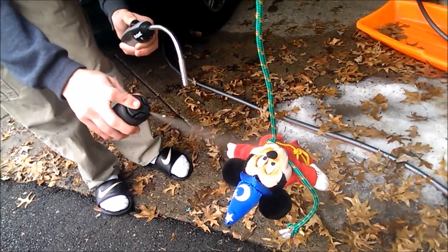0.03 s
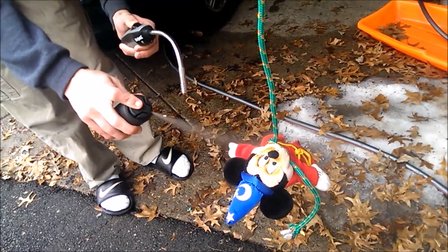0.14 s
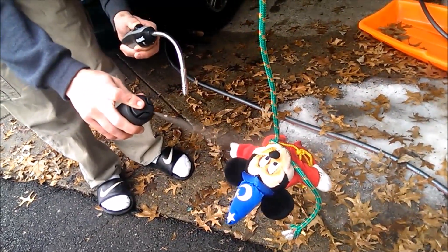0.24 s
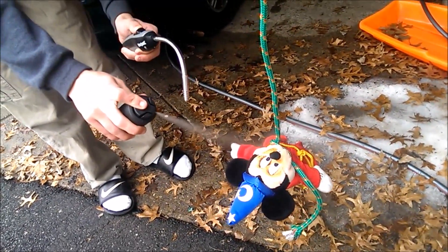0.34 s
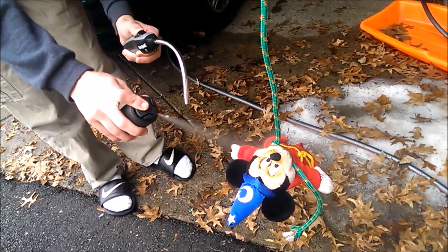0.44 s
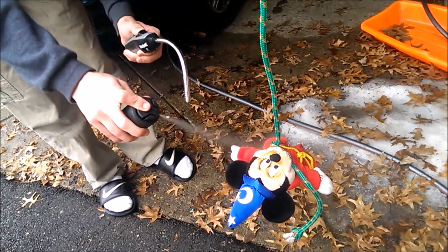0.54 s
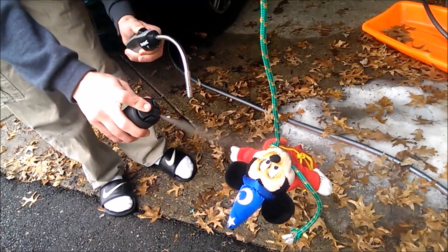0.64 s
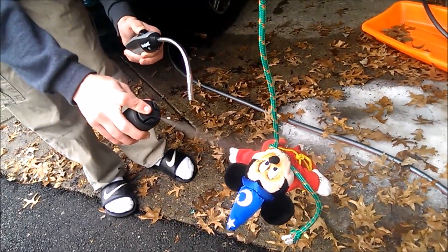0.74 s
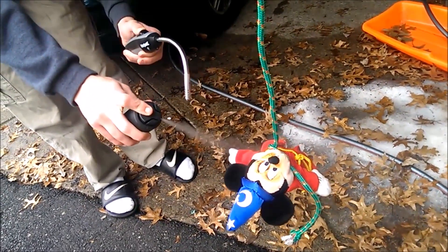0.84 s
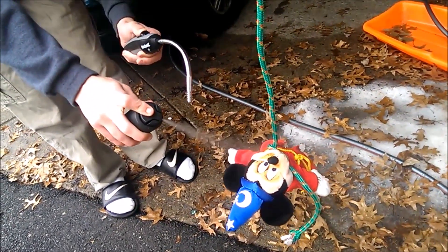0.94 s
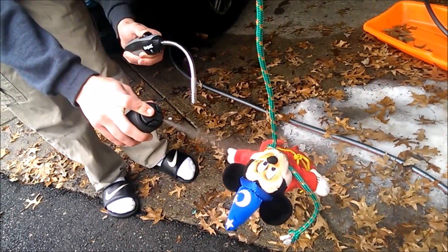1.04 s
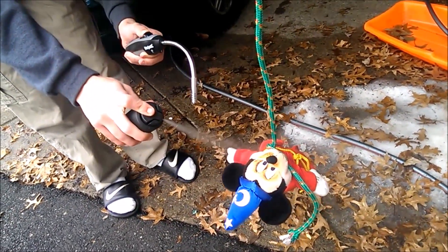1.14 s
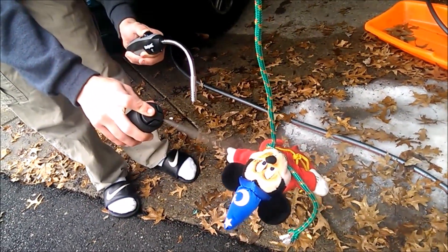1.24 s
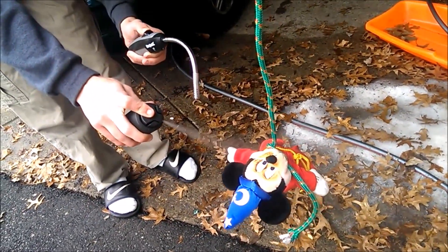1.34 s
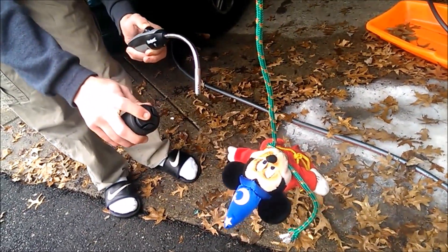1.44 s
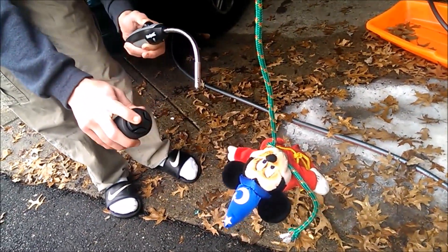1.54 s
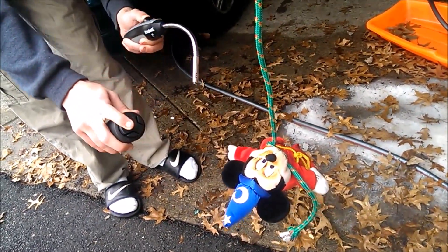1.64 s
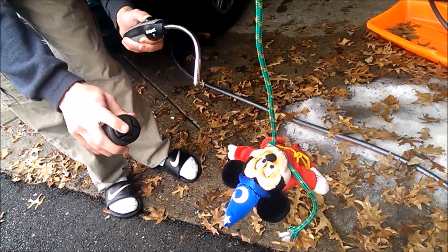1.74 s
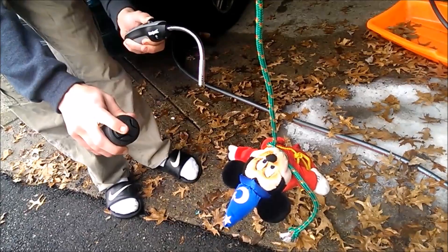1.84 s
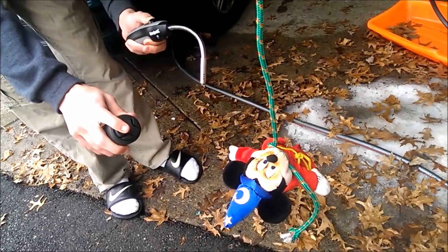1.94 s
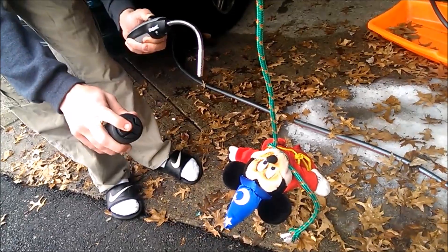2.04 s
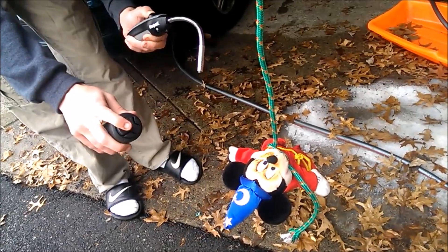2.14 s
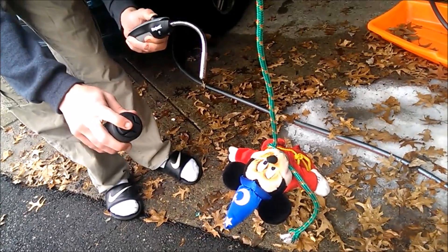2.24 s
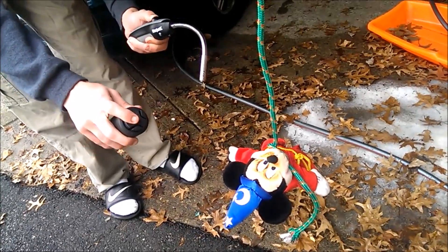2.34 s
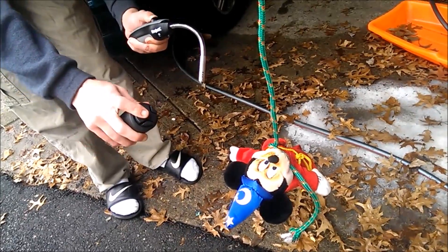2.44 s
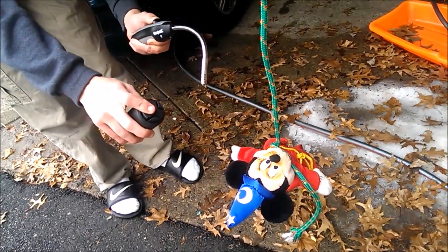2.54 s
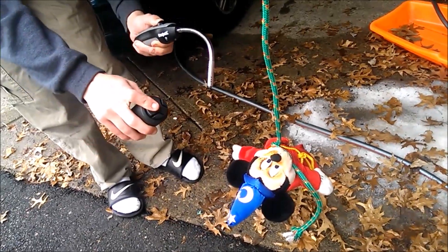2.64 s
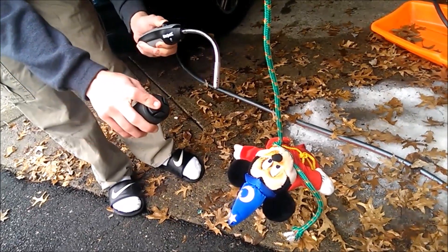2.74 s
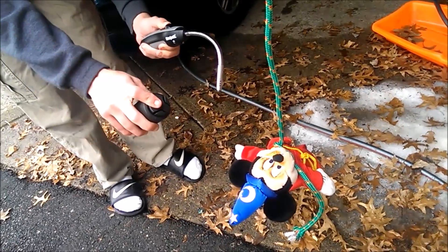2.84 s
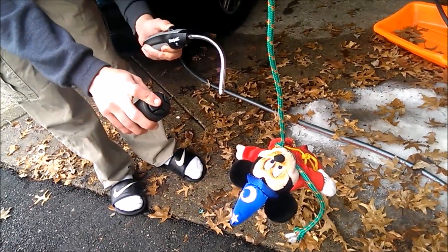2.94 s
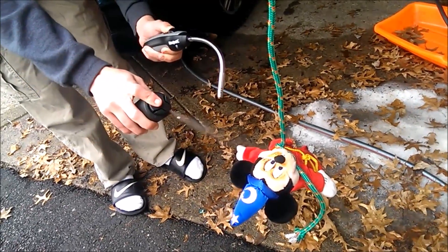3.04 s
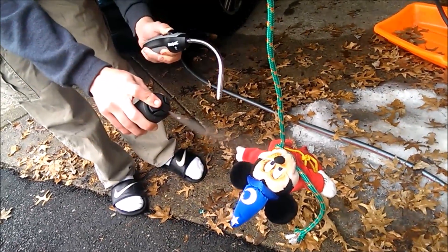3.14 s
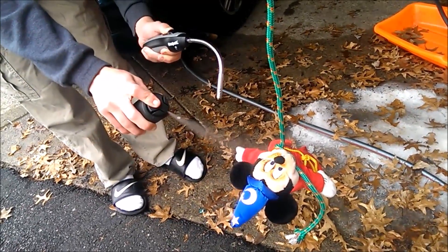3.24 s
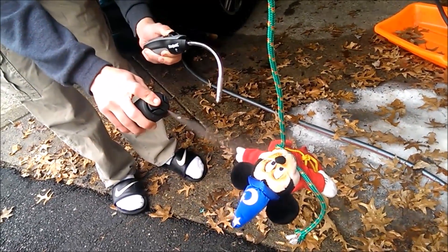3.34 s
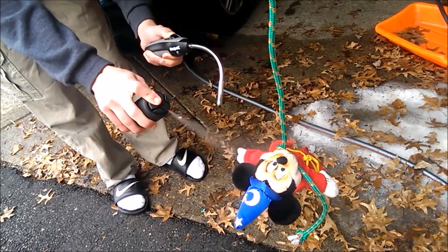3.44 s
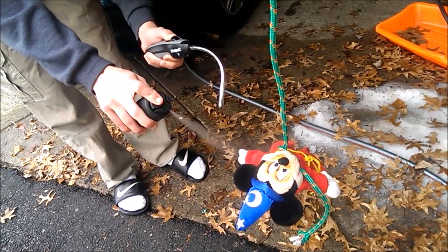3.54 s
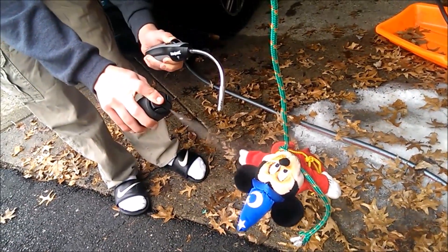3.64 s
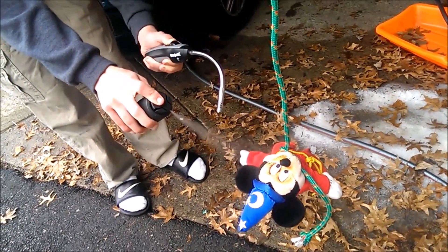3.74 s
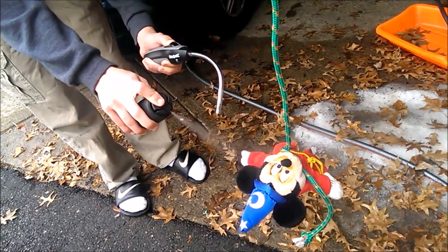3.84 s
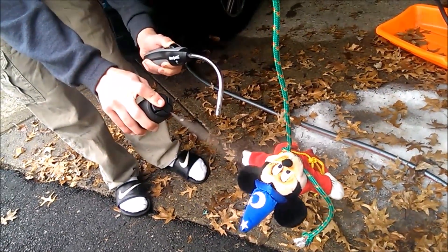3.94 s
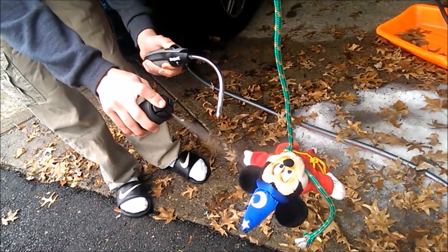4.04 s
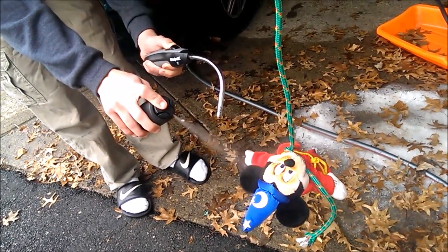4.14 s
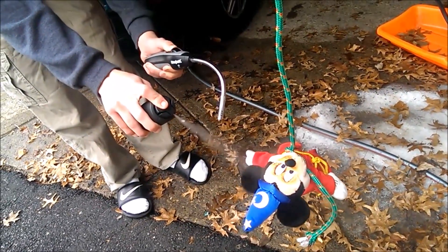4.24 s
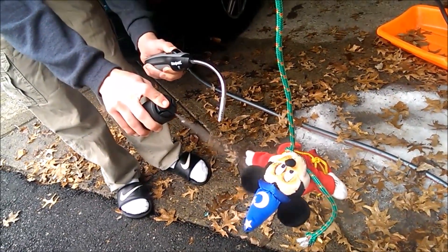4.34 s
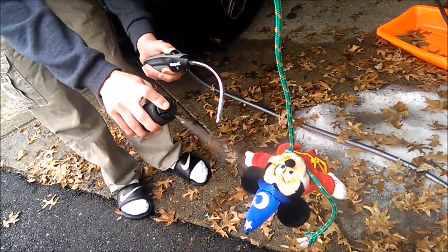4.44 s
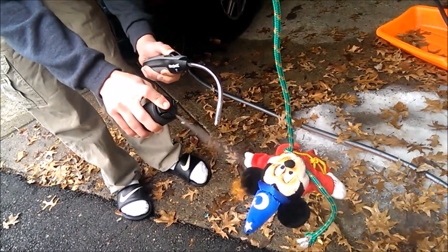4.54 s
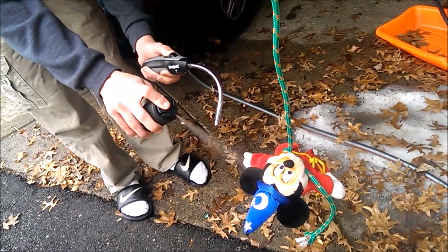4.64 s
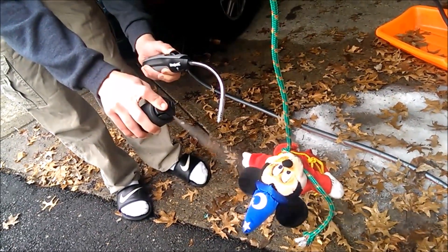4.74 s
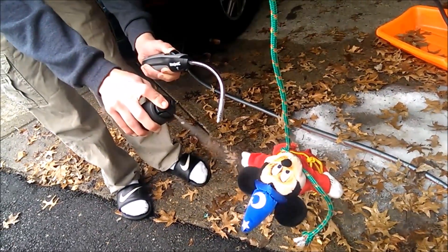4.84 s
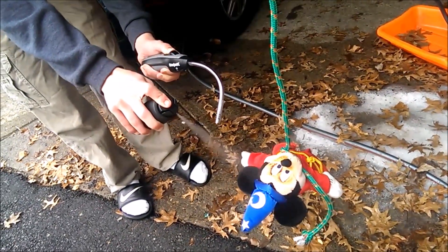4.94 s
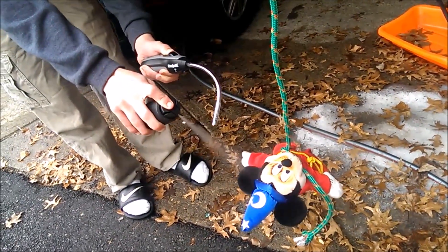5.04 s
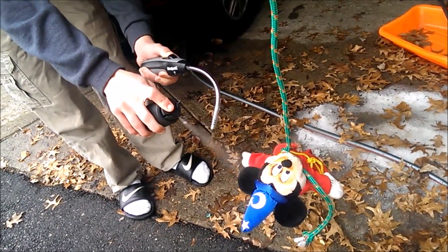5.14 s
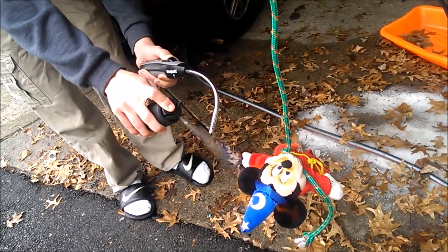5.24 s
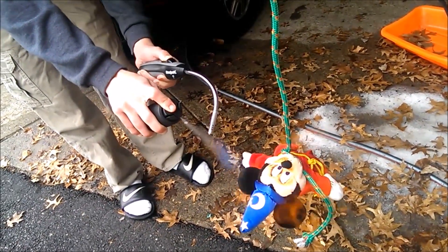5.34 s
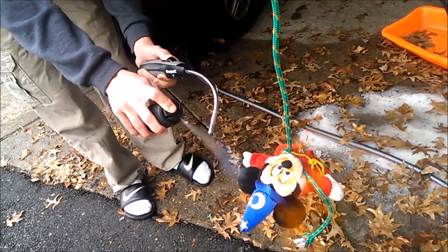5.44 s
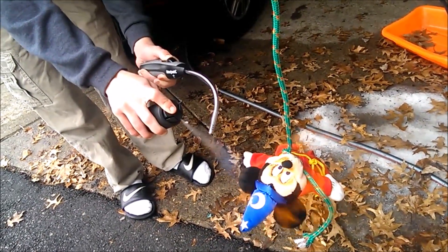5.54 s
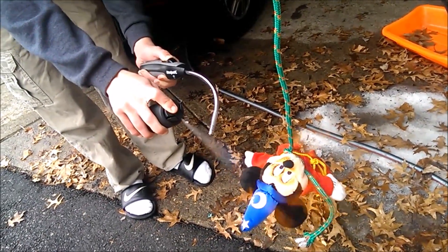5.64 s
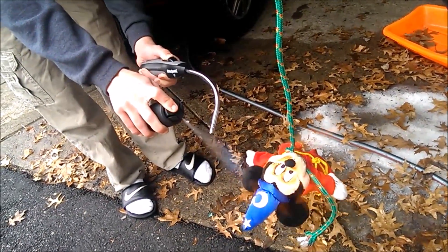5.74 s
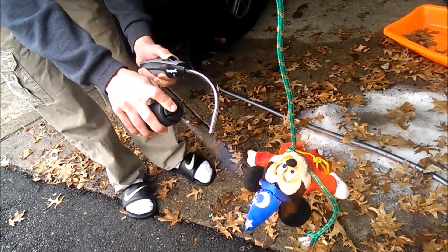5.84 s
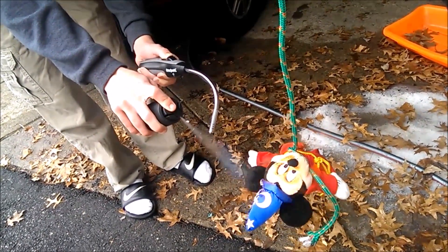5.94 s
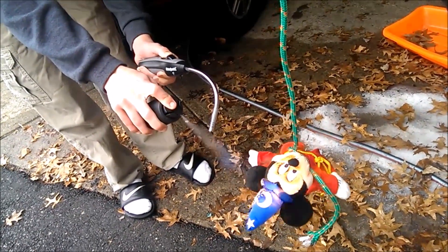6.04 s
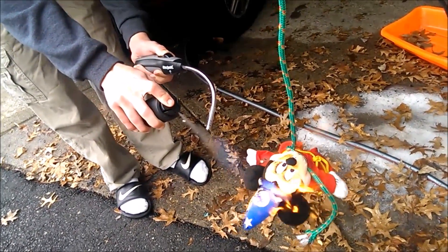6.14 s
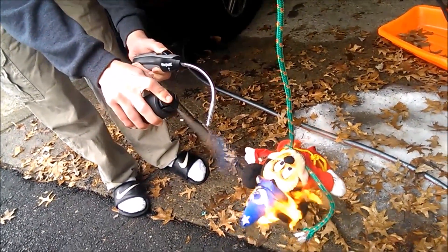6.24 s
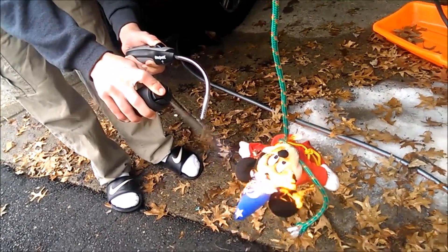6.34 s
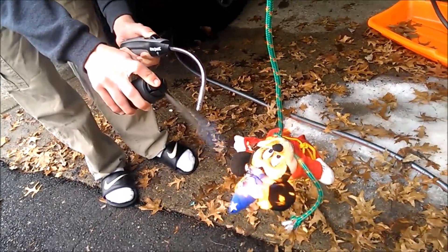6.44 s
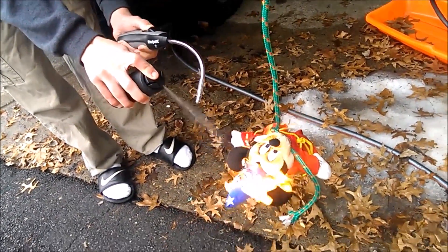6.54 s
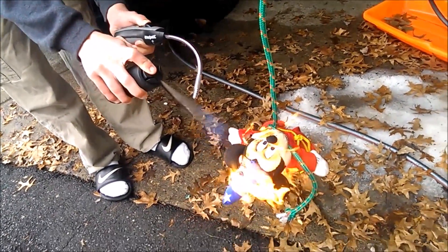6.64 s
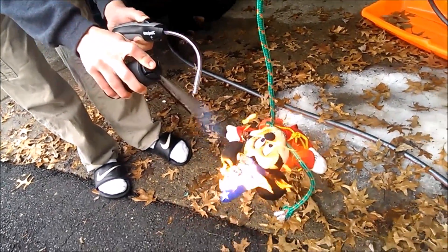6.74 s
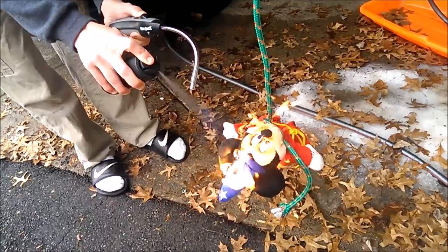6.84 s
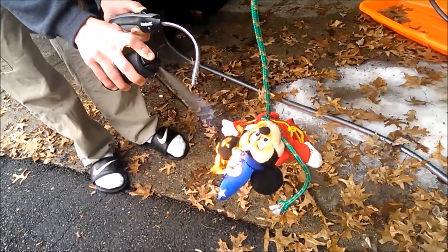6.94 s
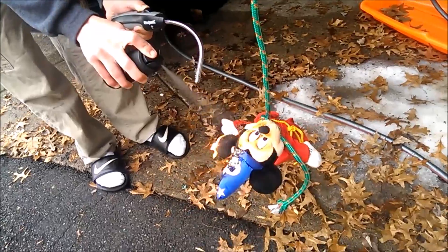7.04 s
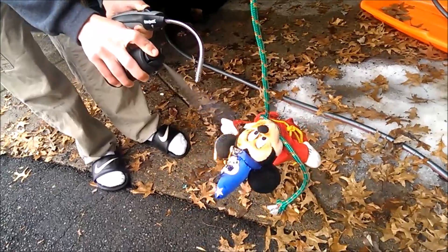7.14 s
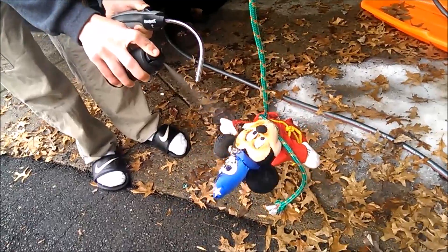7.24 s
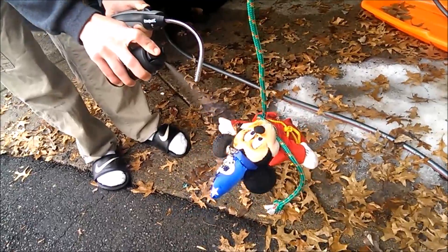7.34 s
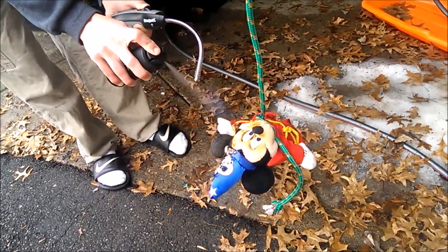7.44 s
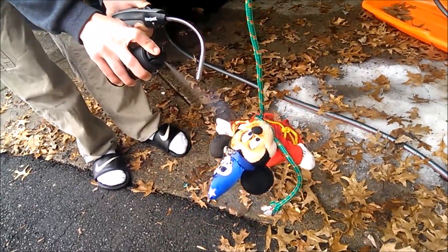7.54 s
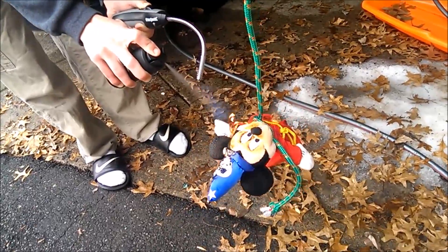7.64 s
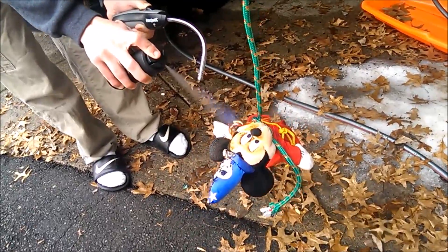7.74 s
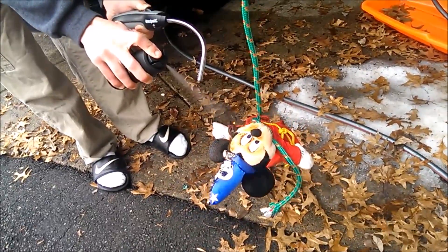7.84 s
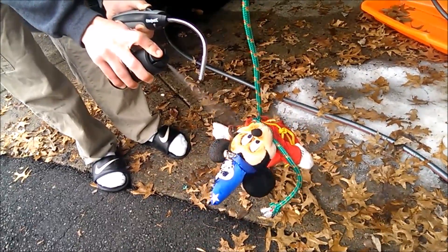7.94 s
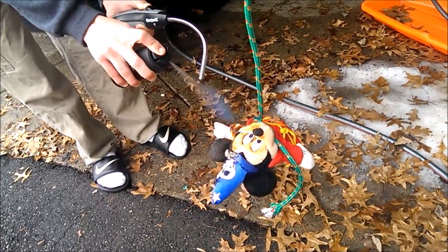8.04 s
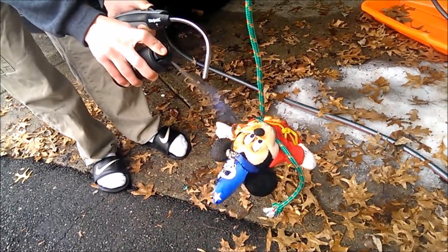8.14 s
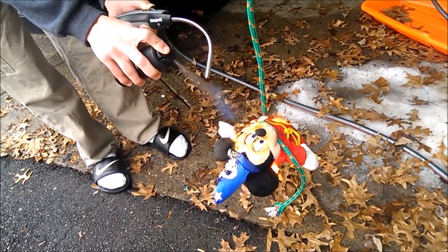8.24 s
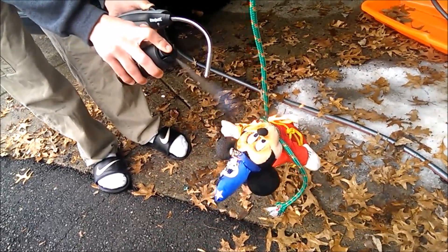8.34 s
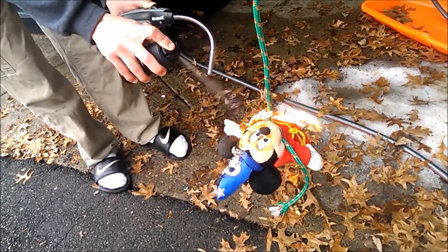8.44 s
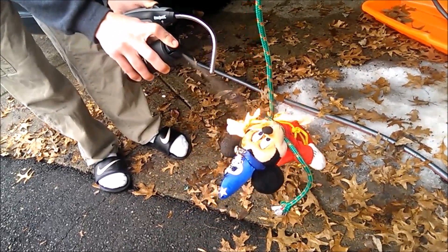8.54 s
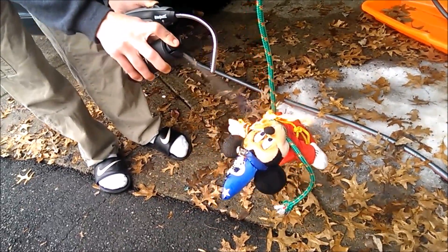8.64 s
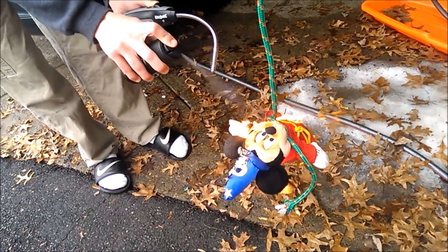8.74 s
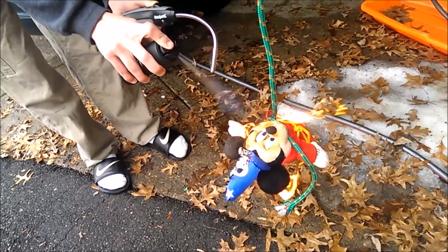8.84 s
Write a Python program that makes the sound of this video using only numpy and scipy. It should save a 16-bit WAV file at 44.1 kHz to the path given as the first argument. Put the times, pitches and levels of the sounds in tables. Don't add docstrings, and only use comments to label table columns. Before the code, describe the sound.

Close spray-can hiss and sharp lighter clicks, a brief quiet gap, renewed spray, one short fiery pop, then a rough flame roar sputtering and relighting.

```python
import sys
import numpy as np
from scipy import signal
from scipy.fft import rfft, irfft
from scipy.io import wavfile
from scipy.ndimage import uniform_filter1d

SR = 44100
rng = np.random.default_rng(int(sys.argv[2]) if len(sys.argv) > 2 else 0)


def wav_record(signal):
    frames = np.transpose(np.atleast_2d(signal))
    bounded = np.clip(frames, -1, 1)
    quanta = np.round(bounded * 32767).astype(np.int16)
    wavfile.write(sys.argv[1], SR, quanta)


def level_to_linear(level):
    exponent = np.asarray(level, float) / 20
    return 10 ** exponent


N = 392049

FULL_DB = -25
# [t/s, roar level/dB]
VIGOUR = [(5.36, -67), (5.37, -26.5), (5.54, -24.5), (5.9, -24), (6.37, -26), (6.7, -24.5), (6.97, -24),
          (7.17, -25.5), (7.21, -29.5), (7.235, -51), (7.3, -33.5), (7.62, -26), (8.0, -26.5), (8.5, -26),
          (8.74, -28.5), (8.89, -24.5)]


def rms_one(x):
    return x / np.sqrt(np.mean(x ** 2) + 1e-20)


def in_time(rows):
    s, level_db = np.transpose(rows)
    return np.interp(np.arange(N) / SR, s, level_db, left=-150.)


def at_hz(points, hz):
    table = np.array(points)
    return np.interp(np.log(hz), np.log(table[:, 0]), table[:, 1])


def drift(rate_hz):
    r = np.exp(-80 * np.pi * rate_hz / SR)
    settle = 2000
    white = rng.standard_normal(N // 40 + 2 + settle)
    slow = signal.lfilter([1], [1, -2 * r, r * r], white)[settle:]
    return np.interp(np.arange(N) / 40, np.arange(len(slow)), rms_one(slow))


def ring(x, hz, t60_s):
    r, w = level_to_linear(-60 / (t60_s * SR)), 2 * np.pi * hz / SR
    return signal.lfilter([0, np.sin(w)], [1, -2 * r * np.cos(w), r * r], x + 1e-18)


def fade(x, t60_s):
    return signal.lfilter([1], [1, -level_to_linear(-60 / (t60_s * SR))], x + 1e-18)


def butter(x, order, hz, kind="low"):
    return signal.sosfilt(signal.butter(order, hz, kind, fs=SR, output="sos"), x)


def coloured(x, points, lag_s=0):
    size = 8192
    hz = np.maximum(np.fft.rfftfreq(size, 1 / SR), 1)
    cepstrum = irfft(np.log(level_to_linear(at_hz(points, hz))))
    cepstrum[1:size // 2] *= 2
    cepstrum[size // 2 + 1:] = 0
    pulse = irfft(np.exp(rfft(cepstrum) - 2j * np.pi * hz * lag_s))
    return signal.oaconvolve(np.atleast_2d(x), pulse[None], axes=1)[:, :N]


def blend(shared, common, own):
    shared = np.clip(shared, 0, 1)
    return np.sqrt(shared) * common + np.sqrt(1 - shared) * np.array(own)


def pair(shared):
    common, *own = rng.standard_normal((3, N))
    return blend(shared, common, own)


def spray():
    # [t/s, hiss level/dB]
    valve = [(0, -25), (1.546, -25), (1.58, -33.5), (1.622, -57), (1.66, -79.5), (2.796, -85), (2.824, -50),
             (2.884, -41.5), (3.17, -34.5), (3.198, -27.5), (3.3, -25.5), (7.6, -25), (7.95, -25.5),
             (8.02, -28.5), (8.25, -30.5), (8.89, -32)]
    # [f/Hz, level/dB per Hz]
    jet_spectrum = [(25, 5), (120, -8), (235, -50.5), (310, -14), (700, -14), (1000, -10), (2000, -9),
                    (5000, -7), (9000, -1), (16000, 1.5)]
    nozzle_hz, nozzle_width_hz, nozzle_db = 1220, 98, -24

    hiss_db = in_time(valve)
    splash_db = np.minimum(-2.5 + 0.6 * (FULL_DB - hiss_db), 2.5)
    vigour_db = in_time(VIGOUR)
    falter_db = np.where(vigour_db > -50, FULL_DB - vigour_db, 0)
    splash_db += np.clip(2.1 * falter_db, 0, 7.5)

    jet = rms_one(coloured(pair(0.23), jet_spectrum))
    jet = jet + level_to_linear(nozzle_db) * rms_one(ring(pair(0.7), nozzle_hz, 2.2 / nozzle_width_hz))
    splash = butter(jet, 2, 3500)
    flutter = level_to_linear(0.83 * drift(11.4) + 0.53 * drift(57))
    return level_to_linear(hiss_db - 7.5) * flutter * (jet + (level_to_linear(splash_db) - 1) * splash)


def catch():
    start_s, attack_s, fuel_s, peak_db = 4.698, 0.006, 0.085, -27.5
    fade_db_per_s, die_db_per_s = 130, 270
    age = np.arange(N) / SR - start_s
    rise_db = -17 * np.clip(1 - age / attack_s, 0, 1)
    fall_db = fade_db_per_s * np.minimum(age, fuel_s) + die_db_per_s * np.maximum(age - fuel_s, 0)
    return np.where(age > 0, np.maximum(peak_db + rise_db - fall_db, -150), -150.)


def puffs():
    # [t/s, flare level/dB, pressure push level/dB, depth of the blow-out before it/dB]
    relightings = [(4.7, -25, -12.5, 2), (4.773, -38, -35, 1), (5.372, -18.5, -11.5, 0),
                   (5.567, -41, -15.5, 4.5), (6.691, -20.5, -31, -2), (6.733, -38, -17, 1.5),
                   (6.991, -24, -17, 7.5), (7.059, -47, -13.5, 6.5), (7.091, -33, -16, 4.5),
                   (7.194, -33, -15, 10), (7.268, -28, -25, 0), (7.304, -33, -24, 14), (7.368, -31, -17, 4),
                   (7.414, -27, -31, 6.5), (7.456, -45, -16, 15.5), (7.76, -24, -16, 7.5),
                   (7.8, -28, -21, 4.5), (7.912, -34, -14.5, 9), (7.935, -25, -19, 1.5),
                   (7.998, -40, -18, 7), (8.042, -31, -17, 7.5), (8.076, -44, -22, 4), (8.156, -32, -12, 9),
                   (8.268, -26, -14.5, 4.5), (8.32, -42, -20, 4.5), (8.419, -27, -30, 4),
                   (8.77, -25, -19, 5.5), (8.842, -30, -17, 4.5)]
    t = np.arange(N) / SR
    push, flare, dip_db = np.zeros((3, N))
    for s, flare_db, push_db, depth_db in relightings:
        i = round(s * SR)
        flare[i + 130] = level_to_linear(flare_db)
        blowout_s = max(0.013 + 0.0018 * depth_db, 0.002)
        dip_db[i - round(blowout_s * SR):i] = -depth_db
        near = slice(i - 900, i + 2000)
        u = (t[near] - s) / 0.0023
        swell = np.exp(np.minimum(u, 0))
        collapse = (1 - 0.75 * u) * np.exp(-0.55 * np.abs(u))
        push[near] += level_to_linear(push_db + 3.5) * np.where(u < 0, swell, collapse)
    return push, flare, uniform_filter1d(dip_db, size=150)


def burning():
    # [f/Hz, level/dB per Hz]
    flame_spectrum = [(25, 4), (60, 1), (125, 6.5), (190, -3), (320, 1), (500, -8), (750, -9),
                      (1000, -12.5), (1700, -12.5), (2300, -15), (4000, -22), (6000, -28), (9000, -44)]
    # [f/Hz, left-right likeness 0-1]
    likeness = [(30, 0.98), (300, .93), (700, 0.81), (2000, 0.94), (3000, 0.68), (4500, 0.17), (8000, .35)]
    roar, rumble = 0, 0
    edges_hz = 20 * 2 ** np.arange(0, 9.1, 0.5)
    white = rng.standard_normal((2, 3, N))
    for k, (low, high) in enumerate(zip(edges_hz, edges_hz[1:])):
        common, *own = butter(white[k % 2], 2, [low, high], "band")
        hz = np.sqrt(low * high)
        band_db = at_hz(flame_spectrum, hz) + 0.9 * drift(6.2) + 1.28 * drift(24)
        band = level_to_linear(band_db) * blend(at_hz(likeness, hz), common, own)
        if hz < 230:
            rumble = rumble + band
        else:
            roar = roar + band
    return rms_one(roar), rms_one(rumble)


def flame():
    vigour_db, catch_db = in_time(VIGOUR), catch()
    roar_db = np.maximum(vigour_db, catch_db)
    swing_db = vigour_db - FULL_DB
    rumble_db = -25.5 + np.where(swing_db > -30, 0.41 * swing_db, swing_db)
    rumble_db = np.maximum(rumble_db, catch_db - 0.5)

    push, flare, dip_db = puffs()
    roar, rumble = burning()
    eddies_db = 0.5 * drift(9) + 0.9 * drift(60)
    dull = butter(roar, 3, 2600)
    growth = np.clip((np.arange(N) / SR - 5.36) / 0.047, 0, 1)
    roar = dull + growth * (roar - dull)
    fire = roar * level_to_linear(roar_db - 1.27 + eddies_db + dip_db)
    fire = fire + dull * fade(flare, 0.049)
    fire = fire + rumble * level_to_linear(rumble_db + 0.42 * dip_db + 0.42 * eddies_db) + push
    fire[0] = np.r_[0, 0, fire[0, :-2]]

    echo_s, echo_db = 0.002704, -12
    bounce = np.pad(fire, ((0, 0), (round(echo_s * SR), 0)))[:, :N]
    return fire + level_to_linear(echo_db) * signal.lfilter([0.4], [1, -0.6], bounce)


def lighter():
    # [t/s, peak level/dB, brightness/dB, tail level/dB re peak]
    snaps = [
        (0.46, -9.5, 2.5, -13.5),
        (1.122, -9, 0, -14.5),
        (1.905, -8.5, 1, -13.5),
    ]
    # [t/s, peak level/dB, brightness/dB, tail level/dB re peak]
    ticks = [(0.331, -24.5, -12.5, -10), (0.89, -34, -12, -12), (1.003, -28, -6, -8),
             (1.538, -28.5, -14, -13.5), (1.691, -56, 5, -14), (1.751, -46, -10, -22),
             (1.773, -30.5, -6, -18), (1.866, -59, 0.5, -19.5), (2.027, -50, 2, -39), (2.057, -56, -6, -25),
             (2.107, -62, -1, -16), (2.145, -61, -3, -12), (2.157, -59, 0, -8), (2.672, -60, -15, -25)]
    # [t after snap/s, level/dB]
    rebounds = [
        (-.0012, 4),
        (.0003, 4),
        (.0026, -6.5),
        (.0036, -10),
        (.0049, -3.5),
        (.007, -13.5),
    ]
    # [f/Hz, level/dB, t60/s]
    shell_modes = [(1330, -5, 0.031), (1620, -5, 0.039), (1970, -2.5, 0.03), (3150, 3, 0.027),
                   (3690, 3, 0.018), (4340, -3, 0.03)]
    grip_hz, grip_db, grip_t60_s = 1260, -19.5, 0.025

    knocks, cracks, tails = np.zeros((3, N))
    gentle = np.ones(N)
    for s, *_ in snaps:
        i = round(s * SR)
        gentle[i - 200:i + 600] = 0
    for s, peak_db, bright_db, tail_db in snaps + ticks:
        chances = rng.standard_normal((len(rebounds), 2))
        for (after_s, level_db), (late, luck) in zip(rebounds, chances):
            i = round((s + after_s * (1 + 0.06 * late)) * SR)
            knocks[i] += level_to_linear(peak_db + level_db + 0.5 * luck) * np.sign(late)
            cracks[i] += level_to_linear(peak_db + level_db + bright_db)
        tails[round((s + 0.003) * SR)] += level_to_linear(peak_db + tail_db)

    soft = 1.96 * signal.lfilter([0.25], [1, -0.75], knocks)
    knocks += gentle * (soft - knocks)
    shell = sum(level_to_linear(level_db - 21) * ring(knocks, hz, t60_s) for hz, level_db, t60_s in shell_modes)
    shell += level_to_linear(grip_db) * ring(gentle * knocks, grip_hz, grip_t60_s)
    crack = level_to_linear(-10) * fade(cracks, 0.01) * pair(0.64)
    walls = pair(0.15)
    low = butter(walls, 2, 5500)
    tail = level_to_linear(-0.5) * (fade(tails, 0.25) * low + level_to_linear(-5.5) * fade(tails, 0.2) * (walls - low))
    side_gain = level_to_linear(np.array([[-2.5], [1.5]]))
    return butter(shell * side_gain + crack + tail, 5, 1080, "high")


def bird():
    # [t after start/s, length/s, from f/Hz, to f/Hz, level/dB]
    phrase = [
        (-.14, .055, 1850, 1960, -2.5),
        (-.1, .062, 1950, 2470, 8),
        (0, .05, 3120, 2800, 6.5),
        (0.05, 0.036, 2550, 2150, 5.5),
        (.14, .03, 4000, 3150, -1),
        (.22, .1, 3420, 3380, -4),
    ]
    # [t/s, level/dB]
    song = [
        (1.63, -53.5),
        (2.075, -57),
        (2.52, -58),
    ]
    out = np.zeros(N)
    for start_s, phrase_db in song:
        for after_s, length_s, from_hz, to_hz, level_db in phrase:
            n, i = round(length_s * SR), round((start_s + after_s) * SR)
            phase = 2 * np.pi * np.cumsum(np.linspace(from_hz, to_hz, n)) / SR
            out[i:i + n] += level_to_linear(phrase_db + level_db) * np.sqrt(np.hanning(n)) * np.sin(phase)
    echo_t60_s = 0.3
    echo = rng.standard_normal((2, 9000)) * level_to_linear(-60 * np.arange(9000) / SR / echo_t60_s)
    blur = signal.oaconvolve(out[None], echo, axes=1)[:, :N]
    return out * level_to_linear(drift(25)) + level_to_linear(-40) * blur


def yard():
    # [f/Hz, level/dB per Hz]
    yard_spectrum = [(25, 9.5), (120, -3), (235, -24), (330, -18), (700, -17), (1200, -20), (2400, -15.5),
                     (3400, -12.5), (4100, -30.5), (5000, -34.5), (7000, -31.5), (12000, -44), (16000, -46)]
    return level_to_linear(-59 + 1.29 * drift(3.6)) * rms_one(coloured(pair(0.55), yard_spectrum))


def scene():
    return spray() + flame() + lighter() + bird() + yard()


def top_cut(x):
    return signal.sosfilt(signal.butter(12, 16450, fs=SR, output="sos"), x)


def record(dry):
    # [f/Hz, gain/dB]
    left_port = [(20, -0.5), (6000, 4.5), (7200, 1.5), (8200, 6.5), (9000, 9.5), (9600, 9.5), (10800, 15),
                 (11600, 21), (12600, 21.5), (13500, 17.5), (14800, 12.5), (15700, 13)]
    right_port = [(20, -0.5), (400, 0.5), (1200, 4.5), (1700, 6), (2400, 3.5), (3100, -3), (3600, 11),
                  (4200, 9.5), (5100, 5), (6200, -8.5), (8300, -30.5), (10500, -24), (13000, -43.5),
                  (15500, -9.5)]
    right_lag_s, self_noise_db = 0.0001, -84
    overload_at, creep_db, creep_t60_s = 0.79, -47, 0.11

    ports = np.vstack([coloured(dry[0], left_port), coloured(dry[1], right_port, right_lag_s)])
    ports = np.clip(ports + level_to_linear(self_noise_db) * rng.standard_normal((2, N)), -0.97, 0.97)
    ports = butter(ports, 1, 12, "high")
    excess = np.maximum(np.abs(ports) - overload_at, 0)
    creep = fade(fade(excess, creep_t60_s), creep_t60_s) / (creep_t60_s * SR / 20)
    ports = ports + level_to_linear(creep_db) * creep
    mix = signal.sosfilt(signal.cheby2(16, 60, 16050, fs=SR, output="sos"), ports)
    return top_cut(mix)


dry = scene()
out = record(dry)
wav_record(out)
```